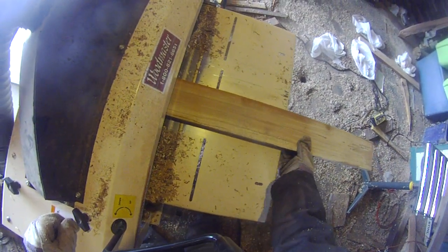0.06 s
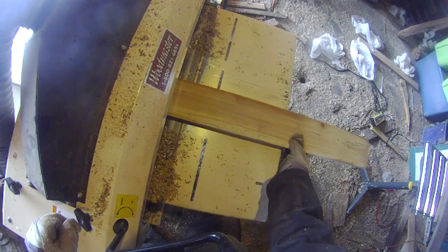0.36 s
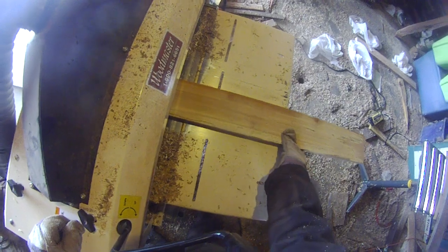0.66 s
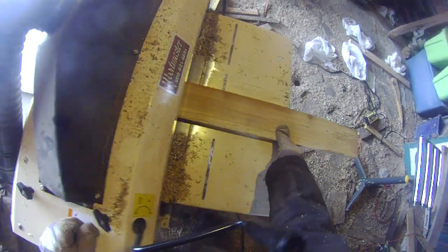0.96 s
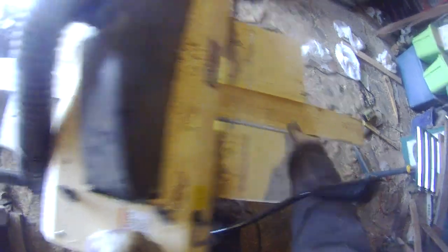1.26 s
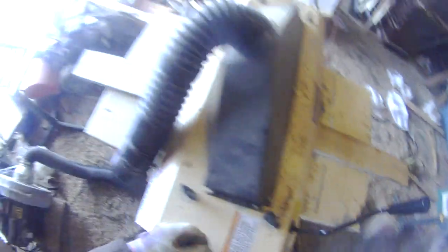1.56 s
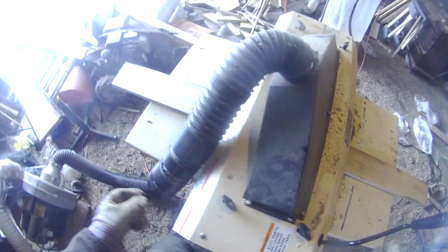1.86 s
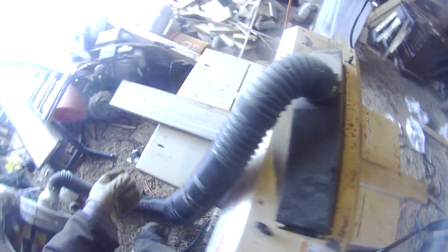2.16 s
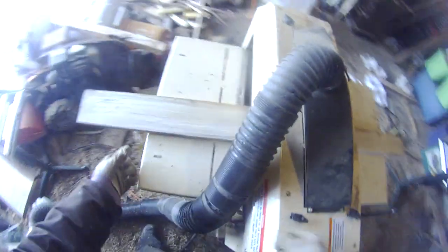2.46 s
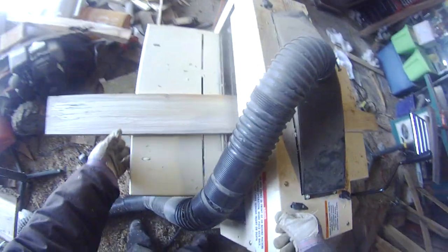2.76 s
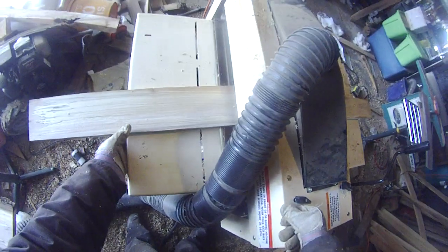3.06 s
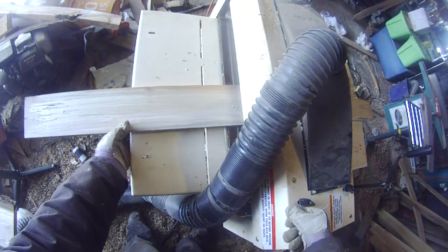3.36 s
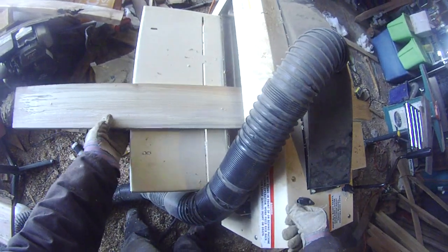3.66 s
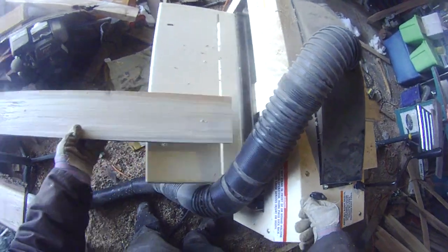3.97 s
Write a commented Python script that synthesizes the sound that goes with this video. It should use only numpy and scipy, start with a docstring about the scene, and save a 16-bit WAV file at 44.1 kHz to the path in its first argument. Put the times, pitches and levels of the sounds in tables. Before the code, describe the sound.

A thickness planer cuts a board throughout, a loud buzzing drone at steady pitch with chip hiss, faint passing whistles and a low dust extraction rumble. From about 1 second the tone shifts as the close microphone moves over the machine. Around 2 seconds come brief bright flares and higher whistles. After that the extraction rumble is a little stronger, and the drone softens slightly toward 4 seconds.

```python
"""Workshop: a thickness planer cuts a board. The cutterhead strikes the wood six times a turn: a loud
drone, with a buzz at the turning rate from uneven knives. Frame and panels hum; brief whistles and
bright flares stand out. Chips hiss and tick, and the dust extraction rumbles in its hose.
The microphone passes five places: 0 infeed, 1 front cover, 2 top, 3 dust hood, 4 outfeed."""
import sys
import numpy as np
from scipy import signal
from scipy.fft import rfft, irfft, next_fast_len
from scipy.io import wavfile
from scipy.ndimage import map_coordinates

SR = 44100
rng = np.random.default_rng(int(sys.argv[2]) if len(sys.argv) > 2 else 0)


def bounce(signal):
    """Save signal as a 16-bit WAV file at the path given by the first command-line argument."""
    frames = np.transpose(np.atleast_2d(signal))
    limited = np.clip(frames, -1, 1)
    pcm = np.round(limited * 32767).astype(np.int16)
    wavfile.write(sys.argv[1], SR, pcm)


N = 176400

KNIVES, PLACES = 6, 5
PLACE_SCATTER_RAD = .5  # phase spread of a line between places
BITE_SHARE = .4  # part of the bite in dB that reaches hiss and whistles

# cutterhead speed: t/s, f/Hz
SHAFT_SPEED = [(0, 67.38), (1.45, 67.36), (1.68, 67.29), (1.92, 67.64), (2.07, 67.5), (2.45, 67.48),
               (2.75, 67.55), (4, 67.56)]
# drone along the path: t/s, level/dB of knife harmonics 1-7
KNIFE_HARMONICS = [(0.0, -32, -35.5, -45.5, -49, -50, -58, -63),
                   (0.12, -28.5, -34, -50.5, -48.5, -57, -57, -58),
                   (0.44, -31.5, -35.5, -35.5, -47, -45, -55, -60),
                   (0.66, -32, -34.5, -34, -48, -47.5, -54, -57),
                   (0.8, -31.5, -34.5, -38, -48.5, -50, -55, -54),
                   (1.02, -33, -32, -35, -43.5, -51, -60, -67),
                   (1.26, -29.5, -30.5, -33.5, -39.5, -51, -47, -54),
                   (1.35, -31, -36, -41.5, -38.5, -50, -66, -54),
                   (1.47, -31, -38.5, -35.5, -37.5, -41, -41.5, -55),
                   (1.59, -28, -40.5, -39.5, -59, -47, -47, -46),
                   (1.83, -28.5, -44.5, -44.5, -51, -44, -51, -49.5),
                   (1.93, -34, -46, -51, -47, -41, -39.5, -42), (2.03, -30, -57, -49, -61, -72, -59, -53),
                   (2.07, -28.5, -52, -52.5, -54, -78, -51, -42.5),
                   (2.28, -35, -45.5, -49.5, -59, -42.5, -42.5, -47.5),
                   (2.45, -33.5, -50.5, -49, -56, -47, -49, -47),
                   (2.64, -33, -53.5, -49, -47.5, -46.5, -73, -68),
                   (3.0, -34, -47, -46.5, -45, -49, -58, -62),
                   (3.16, -36, -45.5, -61, -55, -46.5, -53, -62),
                   (3.46, -37.5, -42.5, -49.5, -52, -42.5, -47, -50.5),
                   (3.66, -39.5, -43.5, -52.5, -45, -47.5, -51, -49),
                   (3.88, -41, -43, -46.5, -40, -51, -47, -58)]
# frame and panel lines: shaft order, level/dB at each place
FRAME_ORDERS = [(1, -59.5, -68, -71.0, -64, -73), (2, -48.5, -53, -51, -52, -60),
                (3, -41, -55, -41.5, -47, -37.5), (4, -44.5, -42, -48, -43, -53),
                (5, -47.5, -41, -42.5, -43.5, -51.5), (7, -49, -51, -65, -60, -46),
                (8, -38.0, -43, -47, -65, -40), (14, -62, -46, -50.5, -61, -57.5),
                (17, -62, -43, -50.0, -65, -62), (20, -57.5, -56, -65, -64, -51.0),
                (25, -53, -43, -57, -67, -51.5), (34, -57.5, -58, -48, -52, -56.5),
                (40, -61, -49.5, -48.5, -43.5, -53)]
# loudness of the cut, in full on the hiss, half on the buzz: t/s, gain/dB
CUT_GAIN = [(0, -0.5), (.3, 1), (.7, 0.5), (1.05, -.5), (1.25, 0.5), (1.52, 1), (1.73, 1.9), (1.84, 1),
            (1.885, 2), (1.925, 3.5), (1.975, 0), (2.2, 0), (2.45, 0), (2.75, -2.5), (3.0, 0), (3.42, 0.9),
            (3.72, -2), (4, 1)]


def amp(db):
    return 10 ** (np.asarray(db) / 20)


def unit_rms(x):
    return x / np.sqrt(np.mean(x ** 2) + 1e-20)


def at_hz(rows, hz):
    """Columns of a frequency table, read on a log axis."""
    f, *cols = np.transpose(rows)
    return np.array([np.interp(np.log(hz + 1), np.log(f + 1), c) for c in cols])


def curves(rows):
    """Columns of a time table, one value per sample."""
    t, *cols = np.transpose(rows)
    return np.array([np.interp(np.arange(N) / SR, t, c) for c in cols])


def wobble(rate_hz):
    """Smooth random curve, rate_hz knots a second."""
    coarse = np.arange(0, N + 64, 64)
    knots = rng.standard_normal(int(N * rate_hz / SR) + 4)
    return np.interp(np.arange(N), coarse, map_coordinates(knots, [coarse * rate_hz / SR]))


def filtered(x, response):
    size = next_fast_len(N + SR // 4)
    return irfft(rfft(x, size) * response(np.fft.rfftfreq(size, 1 / SR)), size)[..., :N]


def coloured(white, spectra):
    """Unit-rms white noise shaped to each density column of a table."""
    return filtered(white, lambda hz: amp(at_hz(spectra, hz))) * np.sqrt(SR / 2)


def swell(start_s, end_s, fade_s=0.042):
    """Linear rise, hold and fall."""
    t = np.arange(N) / SR
    return np.clip(np.minimum(t - start_s, end_s - t) / fade_s + .5, 0, 1)


def knife_drone(angle, bite_db):
    """Knives strike in turn: harmonics of the strike rate, the higher ones roughened by uneven bite."""
    scatter_rad, flutter_db = 0.65, 1
    out = np.zeros(N)
    for k, db in enumerate(curves(KNIFE_HARMONICS), 1):
        phase = scatter_rad * (rng.standard_normal() + 0.5 * wobble(2.23))
        rough_db = bite_db * (k - 1) / len(KNIFE_HARMONICS[0])
        out += amp(db + rough_db + flutter_db * wobble(21)) * np.cos(k * KNIVES * angle + phase)
    return np.sqrt(2) * out


def knock_buzz(angle, place_mix, bite_db):
    """Uneven knives knock the board once a turn, filling the shaft orders between drone and hum."""
    # radiated spectrum: f/Hz, base level/dB at each place
    spectrum = [(667, -51, -54, -60, -54.5, -58.5), (950, -72, -60, -63, -68, -62),
                (1253, -66, -65.5, -70, -75, -71.5), (1500, -59.5, -51, -57, -71, -63.5),
                (1650, -61, -60, -66, -63, -49.5), (1946, -55.5, -57, -52, -50.5, -55),
                (2150, -69, -58, -61, -65, -61.5), (2320, -73, -56, -56, -68, -66),
                (2700, -63, -62, -59, -46, -62), (2830, -68, -57.5, -69, -68, -66),
                (3700, -72, -73.5, -65, -67, -67.5), (4330, -75.5, -77, -72, -74, -69),
                (5150, -79, -78, -69, -71, -74.5), (6660, -82, -85, -79, -87, -75)]
    # accents: f/Hz, gain/dB on a knife harmonic, one order above, two orders below
    accents = [(720, 0, -5, -4), (1240, 0, 16, 12), (1790, 0, 5, -11), (2170, 0, 8, 8), (2680, 0, 1, 0),
               (3270, 6.5, 5, 8), (3750, 12.5, 1, 8), (4240, -5, -1, 11), (5400, -2, 0, 11),
               (6740, -3, -1, 1)]
    knock_t60_s, smear_hz = 0.029, 3440  # the knock loses its sharp timing above smear_hz
    drift_db, trim_db = 2.8, -0.73
    shaft_hz, points = SHAFT_SPEED[0][1], 256
    t = np.arange(points) / points / shaft_hz  # one turn
    knock = rng.standard_normal(points) * amp(-60 * t / knock_t60_s)
    knock_rad = np.angle(rfft(knock))
    taken = [round(row[0]) for row in FRAME_ORDERS]
    taken += [k * KNIVES for k in range(len(KNIFE_HARMONICS[0]))]
    out = np.zeros(N)
    for order in range(9, 101):
        if order in taken:
            continue
        hz = order * shaft_hz
        accent_db = dict(zip((0, 1, KNIVES - 2), at_hz(accents, hz))).get(order % KNIVES, 0)
        db = at_hz(spectrum, hz) @ place_mix + accent_db + drift_db * wobble(4.96)
        phase = knock_rad[order] + (hz / smear_hz) ** 2 * rng.standard_normal() + 0.18 * wobble(4.1)
        phase += PLACE_SCATTER_RAD * rng.standard_normal(PLACES) @ place_mix
        out += amp(db) * np.cos(order * angle + phase)
    return amp(trim_db + 0.5 * curves(CUT_GAIN)[0] + bite_db) * np.sqrt(2) * out


def frame_hum(angle, place_mix):
    """Frame and panels ring at single shaft orders; each drifts in level as the microphone moves."""
    drift_db = 1.8
    out = np.zeros(N)
    for order, *place_db in FRAME_ORDERS:
        phase = rng.uniform(0, 2 * np.pi) + PLACE_SCATTER_RAD * rng.standard_normal(PLACES) @ place_mix
        phase += 0.21 * wobble(3.8)
        db = np.array(place_db) @ place_mix + drift_db * wobble(5.91)
        out += amp(db) * np.cos(round(order) * angle + phase)
    return np.sqrt(2) * out


def cutting_hiss(angle, place_mix, bite_db):
    """Torn fibres and flying chips hiss, pulsing with each knife."""
    # cutting and air hiss: f/Hz, base density/(dB/Hz) at each place
    spectrum = [(150, -110, -110, -110, -110, -110), (472, -64, -82, -71, -70, -93),
                (640, -69, -75, -71.5, -70.5, -70.5), (1020, -76.5, -77, -90, -76.5, -77),
                (1610, -78.5, -74, -75.5, -78.5, -75), (2240, -82, -86, -84, -79, -78),
                (2860, -82, -79, -75, -76.5, -76.5), (3670, -83.5, -85, -80, -78.5, -76.5),
                (4870, -87.5, -88.5, -83.5, -83, -82), (6250, -92.5, -89.5, -84.5, -86.5, -85),
                (9700, -94.5, -96.5, -89, -90, -86), (11500, -97, -98.5, -93.5, -93, -90),
                (15300, -101, -100, -97, -97, -93)]
    pulse_depth, ticks_db = .1, -7.8
    pulsing = np.exp(pulse_depth * np.cos(KNIVES * angle))
    ticks = amp(ticks_db) * chip_ticks()
    hiss = unit_rms(pulsing * rng.standard_normal(N))
    spray = unit_rms(hiss + ticks)
    gain_db = curves(CUT_GAIN)[0] + BITE_SHARE * bite_db
    return amp(gain_db) * np.sum(place_mix * coloured(spray, spectrum), axis=0)


def chip_ticks():
    """Chips hit the hood: short bright ticks, a few much harder than the rest."""
    rate_hz, t60_s, spread_db, highpass_hz = 600, .004, 4, 5960
    hits = rng.random(N) < rate_hz / SR
    strength = amp(spread_db * np.clip(rng.standard_normal(N), -2, 2))
    t = np.arange(SR // 20) / SR
    envelope = signal.fftconvolve(hits * strength, amp(-60 * t / t60_s))[:N]
    ticks = unit_rms(envelope * rng.standard_normal(N))
    return unit_rms(filtered(ticks, lambda hz: 1j * hz / (highpass_hz + 1j * hz)))


def whistles(angle, bite_db):
    """Single shaft orders swell into wavering whistles and stop."""
    # whistles: start/s, end/s, shaft order, level/dB
    events = [(0.187, .6, 58, -53), (.42, .95, 64, -61), (1.078, 1.497, 52, -56.5), (1.52, 1.93, 50, -52),
              (1.7, 1.95, 64, -55.5), (1.873, 1.95, 70, -49), (2.07, 2.164, 58, -46), (2.14, 2.28, 70, -51),
              (2.62, 2.98, 76, -59), (2.88, 3.694, 25, -47)]
    out = np.zeros(N)
    for start_s, end_s, order, db in events:
        phase = rng.uniform(0, 2 * np.pi) + .5 * wobble(16)
        out += amp(db) * swell(start_s, end_s) * np.cos(round(order) * angle + phase)
    return np.sqrt(2) * amp(BITE_SHARE * bite_db) * out


def hose_flares(bite_db):
    """Cutting noise rings in a bright resonance as the microphone passes the hose."""
    # flares: start/s, end/s, centre/Hz, half-width/Hz, level/dB
    events = [(1.876, 1.945, 4660, 1200, -44.5), (2.008, 2.26, 5570, 400, -54.5)]
    out = np.zeros(N)
    for start_s, end_s, centre_hz, half_width_hz, db in events:
        noise = amp(bite_db) * rng.standard_normal(N)
        ring = filtered(noise, lambda hz: (1 + 1j * (hz - centre_hz) / half_width_hz) ** -2)
        out += amp(db) * swell(start_s, end_s) * unit_rms(ring)
    return out


def extraction_rumble():
    """Turbulent air churns in the extraction hose."""
    # hose air: f/Hz, base density/(dB/Hz)
    spectrum = [(20, -101), (45, -88), (85, -82.5), (105, -73), (135, -67), (170, -58), (220, -57),
                (290, -60), (370, -65.5), (465, -60), (570, -68.5), (720, -84), (1200, -115)]
    # slow rise and fall: t/s, gain/dB
    gain = [(0, 0.5), (.3, 0), (.9, 0), (1.4, -1.5), (1.95, -3.5), (2.25, 1.5), (2.55, 2.5), (3.2, 2),
            (4, 2)]
    churn_db, churn_hz = 1, 22
    gain_db = curves(gain)[0] + churn_db * wobble(churn_hz)
    return amp(gain_db) * coloured(rng.standard_normal(N), spectrum)[0]


def scene():
    """One shaft drives all but the air; the microphone hears a blend of the nearest places."""
    # microphone path: t/s, place (0-4)
    mic_path = [(0, 0), (1.05, .05), (1.3, .6), (1.44, 1), (1.57, 1.15), (1.75, 1.85), (1.93, 2.05),
                (2.02, 3), (2.44, 3.1), (2.53, 3.85), (2.8, 4), (4, 4)]
    # once-a-turn chatter of one proud knife: depth/dB at each place
    chatter_db = [.3, 4, 3.2, 2.2, .8]
    turn_spread_db, strike_spread_db = 1.4, 2.1  # uneven bite of the knives
    speed_hz = curves(SHAFT_SPEED)[0] + 0.016 * wobble(25.45)
    angle = 2 * np.pi * np.cumsum(speed_hz) / SR
    place = curves(mic_path)[0]
    place_mix = np.maximum(0, 1 - abs(place - np.arange(PLACES)[:, None]))
    shaft_hz = SHAFT_SPEED[0][1]
    bite_db = turn_spread_db * wobble(shaft_hz) + strike_spread_db * wobble(shaft_hz * KNIVES)
    bite_db += np.array(chatter_db) @ place_mix * np.cos(angle - 1)
    tones = knife_drone(angle, bite_db) + frame_hum(angle, place_mix)
    tones += knock_buzz(angle, place_mix, bite_db) + whistles(angle, bite_db)
    noise = cutting_hiss(angle, place_mix, bite_db) + hose_flares(bite_db) + extraction_rumble()
    return (tones + noise)[None]


def record(dry):
    """Brick-wall low-pass."""
    cutoff_hz = 15350
    return filtered(dry, lambda hz: hz < cutoff_hz)


dry = scene()
out = record(dry)
bounce(out)
```